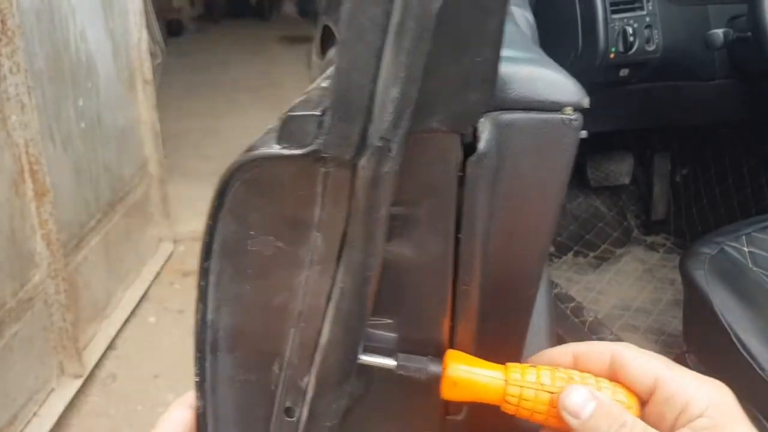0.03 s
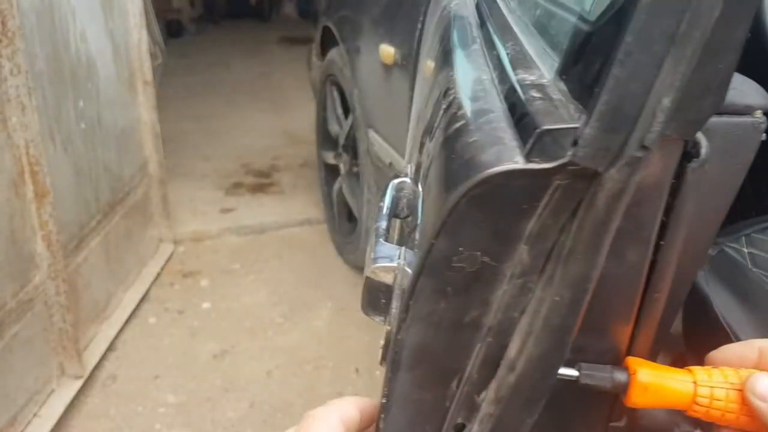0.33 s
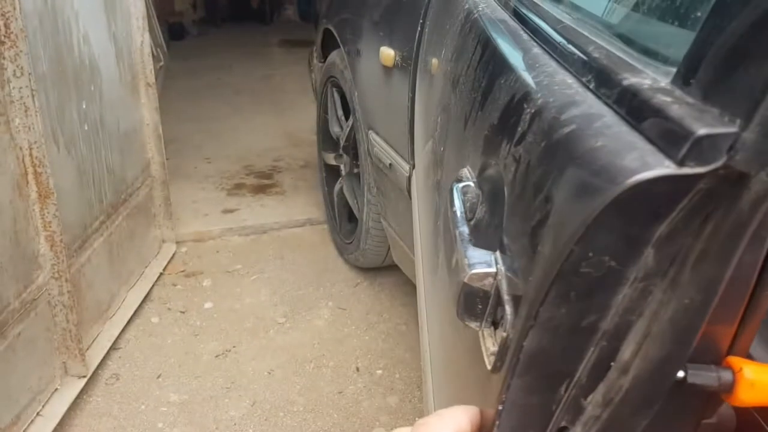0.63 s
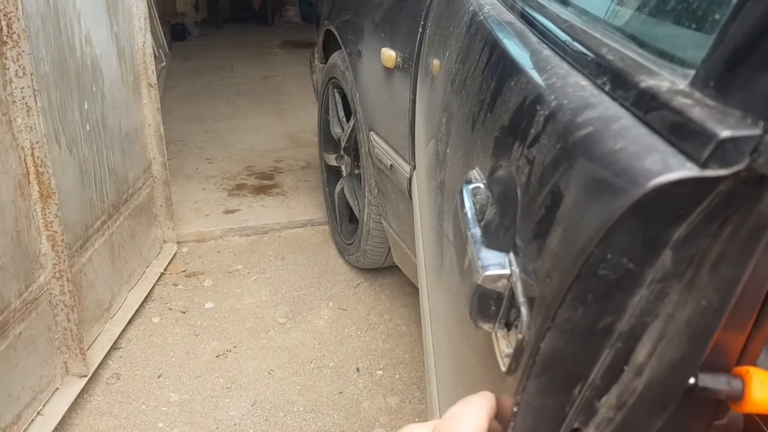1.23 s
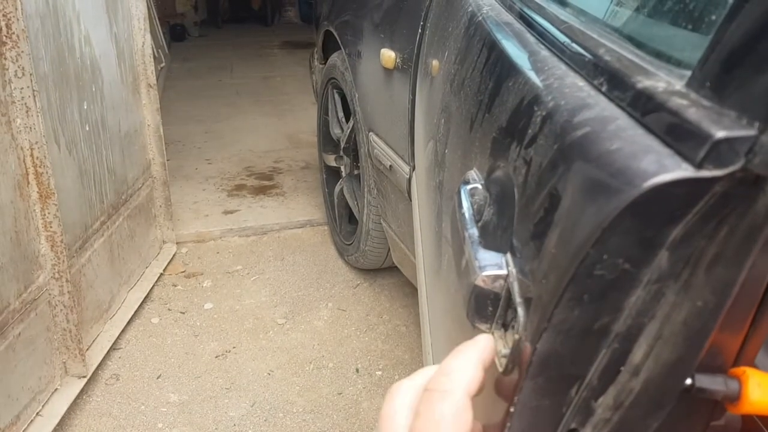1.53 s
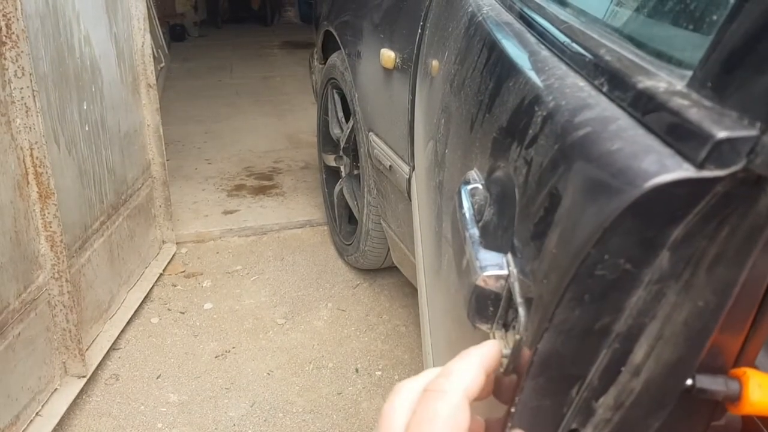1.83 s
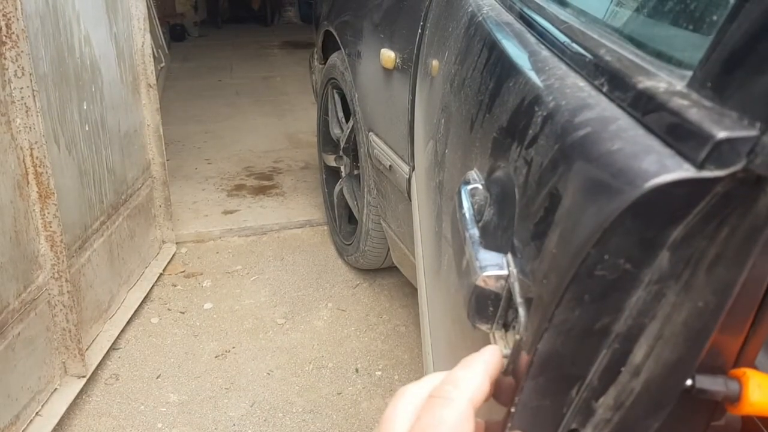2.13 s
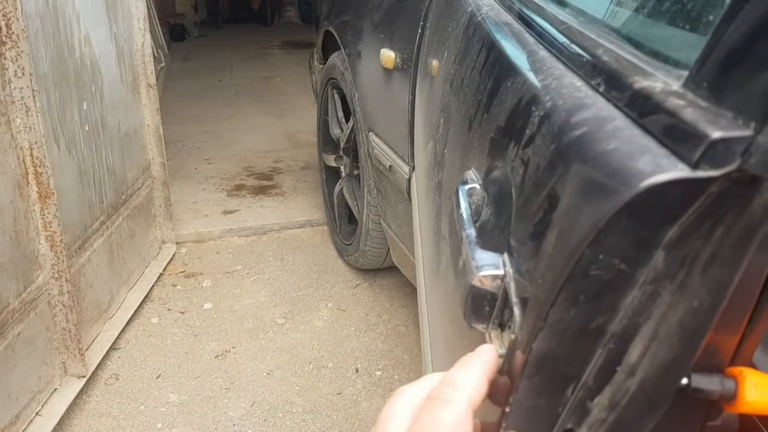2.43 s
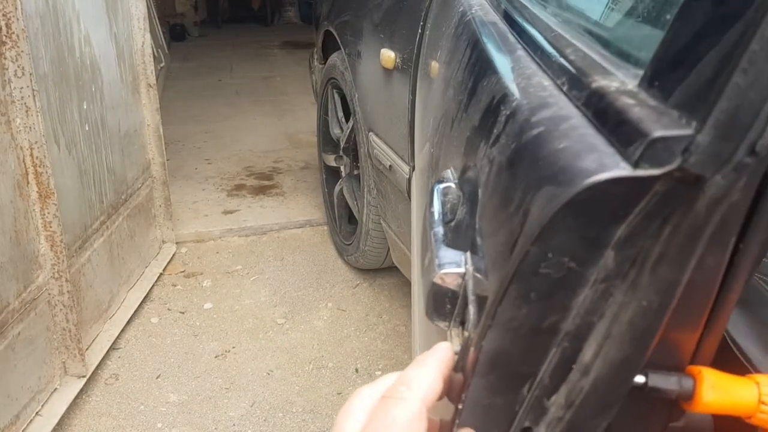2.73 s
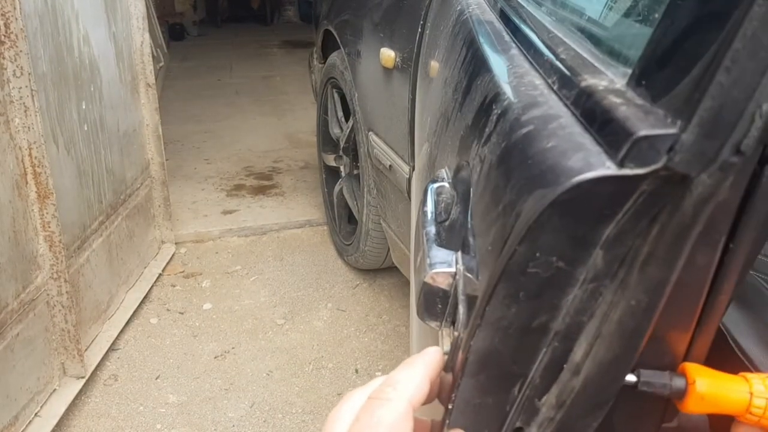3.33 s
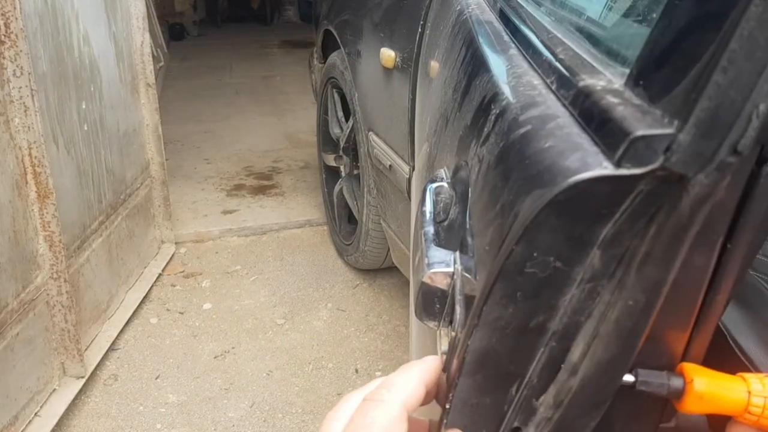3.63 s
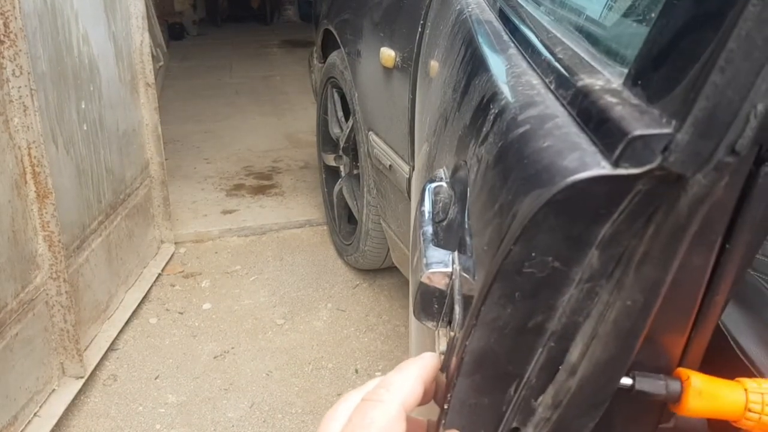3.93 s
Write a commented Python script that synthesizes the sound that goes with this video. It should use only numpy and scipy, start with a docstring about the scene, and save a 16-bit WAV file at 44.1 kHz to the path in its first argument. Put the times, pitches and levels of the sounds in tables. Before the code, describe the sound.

A dry car door hinge squeals twice as the door is swung by hand. Each high squeal starts with a small chirp, turns raspy and rings briefly in the garage. A low rumble continues underneath.

```python
"""A dry car door hinge squeals twice as the door is swung by hand in a garage.
Each squeal starts with a small chirp, then the pin sticks and slips so fast that it sings near 3.8 kHz.
As it binds harder a higher tone takes over, an octave below joins in and the slipping turns raspy.
The door steel and the garage ring on over a low rumble. Later the hand rubs softly on the door,
a hum grows and there is one faint hoot."""
import sys
import numpy as np
from scipy import signal
from scipy.fft import rfft, irfft
from scipy.io import wavfile

SR = 44100
rng = np.random.default_rng(int(sys.argv[2]) if len(sys.argv) > 2 else 0)


def dump(signal):
    """Clip the signal to [-1, 1] and save it as 16-bit WAV at the path in sys.argv[1]."""
    limited = np.clip(np.atleast_2d(signal).T, -1, 1)
    pcm = np.round(limited * 32767).astype(np.int16)
    wavfile.write(sys.argv[1], SR, pcm)


N = 176400
T = np.arange(N) / SR
HZ = np.fft.rfftfreq(N, 1 / SR)

# Tone colour of the low rumble and of the faint air: frequency_hz, level_db
RUMBLE_COLOUR = [(12, -33), (24, -5), (32, -17.5), (45, -1.5), (75, 0), (105, -1.5), (150, -15),
                 (180, -10.5), (230, -19), (290, -23.5), (380, -32), (600, -70)]
AIR_COLOUR = [(180, -31), (300, -8.5), (424, -12), (709, -18.5), (770, -23), (809, -12), (1570, -19),
              (1760, -25), (2080, -23), (2330, -30), (2660, -29), (3890, -26), (7530, -40), (12400, -24),
              (15600, -23)]
# How the rumble and the hum rise and fall: time_s, level_db
RUMBLE_LOUDNESS = [(0, -51), (.45, -50.5), (.95, -49), (1.15, -44.5), (1.35, -48.5), (1.6, -50), (2.0, -51),
                   (2.65, -48), (3.2, -49.5), (4, -48)]
HUM_LOUDNESS = [(0, -61), (2.6, -56), (2.85, -44.5), (3.1, -47), (3.6, -48.5), (4, -51)]
# Thin, steady whistles in the background: pitch_hz, width_hz, level_db
THIN_WHISTLES = [(291.8, 10.2, -72.5), (764, 17, -80), (2299, 50, -74)]
# How alike the background noise is on the two sides: frequency_hz, likeness_0_to_1
SIDE_LIKENESS = [(30, 1), (130, 0.92), (260, 0.89), (500, 0.7), (1000, 1), (2300, 0.32), (5000, 0.15),
                 (15000, 0.033)]
# How far the background leans to the left: frequency_hz, left_minus_right_db
LEFT_LEAN = [(30, 17.5), (70, 5.5), (150, 2), (500, 4.5), (1000, 0.5), (2300, 7), (5000, 4), (12000, 1.5)]
# Chirps, side tones and groans of the hinge: start_s, length_s, start_hz, end_hz, level_db
HINGE_CHIRPS = [(0.159, 0.073, 2594, 2375, -54.5), (0.194, 0.061, 2380, 2274, -50.5),
                (0.219, 0.068, 2295, 2270, -43.5), (0.185, 0.14, 4300, 4370, -54),
                (0.324, 0.22, 4008, 4030, -41.5), (.34, 0.308, 5860, 5792, -41),
                (0.441, 0.17, 1983, 1961, -40.5), (1.549, 0.072, 2320, 2318, -50),
                (1.587, 0.065, 2200, 2065, -61.5), (1.633, 0.16, 4310, 4320, -42),
                (1.66, 0.13, 4098, 4050, -42), (1.66, .13, 1170, 1077, -68.5),
                (1.729, 0.17, 5897, 5825, -46.5), (1.78, 0.12, 1060, 924, -62),
                (2.297, 0.11, 3755, 3797, -65), (2.33, 0.15, 3922, 3990, -69),
                (2.73, 0.194, 2800, 2890, -76)]
# Small knocks from the door: start_s, level_db, centre_hz
DOOR_KNOCKS = [(.169, -62, 5000), (.337, -58, 1100), (.6, -52.5, 1500)]
# The pin in each swing. It sings a "free" tone when turning easily and a "bound" tone when tight:
# time_s, free_tone_db, bound_tone_db, octave_below_share_db, roughness_0_to_1
FIRST_PIN_PATH = [(.205, -74, -64, -45, 0.7), (.24, -44.5, -75, -46, 0.75), (.275, -42.5, -53.5, -57, 0.65),
                  (.31, -32.5, -53, -38, 0.12), (.355, -32.5, -49, -8.5, 0.29), (.39, -46, -36, -5, 0.1),
                  (.44, -50, -35.5, -6, 0.54), (.5, -40, -49, 6, 0.74), (.57, -46, -45, -2, 0.88),
                  (.615, -34.5, -68, -5.5, 0.36), (.7, -33.5, -50, -16, 0.13), (.74, -34, -58, -14, 0.2),
                  (.79, -37, -80, -10, 0.25)]
SECOND_PIN_PATH = [(1.65, -76, -69, -41.5, 0.79), (1.685, -50.5, -49, -40, 1),
                   (1.725, -35.5, -48, -30, 0.34), (1.765, -34, -44, -8.5, 0.19),
                   (1.8, -42, -48.5, -1, 0.47), (1.845, -46, -44, 2.5, 0.37), (1.94, -53, -39, -21.5, 0.51),
                   (1.975, -36.5, -48.5, -6, 0.17), (2.015, -35.5, -55, -7, 0.047),
                   (2.07, -64, -62, 2, 0.18), (2.11, -66, -73, 0, 0.091), (2.2, -75, -73, -14, 0.075)]
# The pure tones that make up the squeal and its octave below: pitch_multiple, level_db
SQUEAL_PARTIALS = [(1, 0), (2, -13), (3, -19), (4, -46)]
OCTAVE_BELOW_PARTIALS = [(.5, -5), (1.5, -2), (2.5, -19), (3.5, -35)]
# Tone colour of the pin's heavy rasp and light rasp: frequency_hz, level_db
HEAVY_RASP_COLOUR = [(200, -43.5), (600, -17.5), (1000, -10), (1300, -21.5), (1850, 0), (2300, 0.5),
                     (2750, -21.5), (3300, -1), (3800, -2.5), (4600, -5.5), (5700, 0.5), (6600, -3),
                     (7600, -6.5), (8600, -42.5), (9800, -7.5), (11500, -20), (13000, -33), (16000, -36)]
LIGHT_RASP_COLOUR = [(500, -24.5), (1100, -29.5), (1500, -58.5), (2900, -75.5), (3700, 12.5), (4300, -26.5),
                     (4800, -21.5), (6100, -28), (7500, 0), (9200, -52), (11400, -3), (13500, -42)]
# Ringing notes of the hinge and door steel: pitch_hz, level_db, ring_s (time to fall 60 dB)
STEEL_NOTES = [(2103, -8, 1), (2430, -2, 0.74), (3780, -13, 0.39), (3373, -2, 0.99), (3766, 17.5, 1),
               (3930, -2, 0.23), (3980, -2.5, 1), (4380, -21, 1), (4140, -13.5, 0.21), (4000, -10, 1),
               (4905, -7.5, 0.1), (6370, -24, 0.44), (7702, -13, 0.14), (7470, -12, 0.14)]
# How long the garage echoes: frequency_hz, ring_s (time to fall 60 dB)
GARAGE_RING = [(300, 1), (2000, 0.85), (3800, 0.81), (5800, 0.88), (7600, 0.43), (11500, 0.65)]
# How the hinge and its echo change on the right side: frequency_hz, gain_db
RIGHT_COLOUR = [(500, -8.5), (1900, -17), (2500, -6.5), (3800, -4.5), (5800, -3.5), (7600, -8.5),
                (9800, -1.5), (11400, -10), (15000, 2)]
# Soft rubs of the hand on the door: start_s, length_s, level_db
HAND_RUBS = [(2.593, 0.087, -80), (2.972, 0.27, -70), (3.486, 0.21, -73)]
# Tone colour of those rubs: frequency_hz, level_db
RUB_COLOUR = [(200, -28), (450, 0.5), (850, 1), (1200, -15), (2000, -13), (5000, -35)]

JITTER_S = 0.00186  # time scale of the fast flutter in the tones


def amp(db):
    """Turns decibels into a number to multiply by."""
    return 10 ** (np.asarray(db) / 20)


def unit(x):
    """Scales a signal to an average (rms) size of 1."""
    return x / np.sqrt(np.mean(abs(x) ** 2) + 1e-20)


def read(points, hz=HZ):
    """Fills in a curve between its points, with octaves evenly spaced."""
    point_hz, value = np.transpose(points)
    return np.interp(np.log(hz + 1), np.log(point_hz), value)


def colour(x, points):
    """Turns each frequency up or down by a curve in dB."""
    return irfft(rfft(x) * amp(read(points)), N)


def drift(seconds):
    """A smooth random wobble of size 1; more seconds make it slower."""
    return unit(irfft(rfft(rng.standard_normal(N)) / (1 + (HZ * seconds * 2) ** 4), N))


def add(mix, start_s, sound):
    """Mixes a sound in at its start time."""
    part = mix[max(round(start_s * SR), 0):][:len(sound)]
    part += sound[:len(part)]


def later(x, seconds):
    """Delays a sound; its end wraps round to the start."""
    return irfft(rfft(x) * np.exp(-2j * np.pi * HZ * seconds), N)


def noise_pair():
    """Left and right hiss, alike in the bass and less so in the treble."""
    shared, separate = rfft(rng.standard_normal((2, N)))
    likeness = np.clip(read(SIDE_LIKENESS), -1, 1)
    right = likeness * shared + np.sqrt(1 - likeness ** 2) * separate
    return irfft(np.array([shared, right]), N)


def background():
    """Low rumble, faint air, thin whistles, a wavering hum that grows and one brief hoot."""
    rumble_gain = amp(np.interp(T, *np.transpose(RUMBLE_LOUDNESS)))
    noise = rumble_gain * unit(colour(noise_pair(), RUMBLE_COLOUR))
    noise += amp(-66.5) * unit(colour(noise_pair(), AIR_COLOUR))
    for hz, width_hz, db in THIN_WHISTLES:
        narrow_band = 1 / (1 + ((HZ - hz) / width_hz) ** 2)
        noise += amp(db) * unit(irfft(rfft(noise_pair()) * narrow_band, N))
    hum_hz = 71.5 + 1.98 * drift(.1)
    hum_gain = amp(np.interp(T, *np.transpose(HUM_LOUDNESS)))
    tones = np.sqrt(2) * hum_gain * np.sin(2 * np.pi * np.cumsum(hum_hz) / SR)
    hoot = chirp(length_s=.1, start_hz=543.66, end_hz=538.33, db=-62.5, jitter_hz=26)
    add(tones, 3.71, hoot)
    lean = amp(np.outer([.5, -.5], read(LEFT_LEAN)))
    return irfft(rfft(noise + tones) * lean, N)


def chirp(length_s, start_hz, end_hz, db, jitter_hz):
    """A short, unsteady tone that glides as it swells and fades."""
    progress = np.arange(0, 1, 1 / (length_s * SR))
    hz = start_hz + (end_hz - start_hz) * progress + jitter_hz * drift(JITTER_S)[:len(progress)]
    swell = np.sin(np.pi * progress) ** 2
    return amp(db) * np.sqrt(2) * swell * np.sin(2 * np.pi * np.cumsum(hz) / SR)


def door_knock(db, centre_hz, decay_s=0.0094):
    """A dull tick from the door: a burst of noise that dies at once."""
    band = signal.butter(1, [centre_hz / 2, min(centre_hz * 2, SR / 2.1)], "band", fs=SR)
    burst = unit(signal.lfilter(*band, rng.standard_normal(2048)))
    return amp(db) * burst * np.exp(-T[:2048] / decay_s)


def hinge_squeal(pin_path, free_hz, bound_hz, sag_hz_per_s, free_octave_db):
    """The pin sticks and slips, singing two tones; its tiny slips rasp and ring the steel."""
    times, *columns = np.transpose(pin_path)
    free_db, bound_db, octave_db, rough = (np.interp(T, times, column) for column in columns)
    elapsed = T - times[0]
    moving = np.clip(elapsed / .0125, 0, 1) * np.clip((times[-1] - T) / .05, 0, 1)  # fade in and out
    free, bound, octave_share = amp(free_db) * moving, amp(bound_db) * moving, amp(octave_db)
    level = np.hypot(free, bound)

    def phase(start_hz, waver_hz=5, jitter_rad=.45):
        """The pitch sinks and wavers; rough slipping shakes the wave's timing."""
        hz = start_hz - sag_hz_per_s * elapsed + waver_hz * drift(0.01)
        return 2 * np.pi * np.cumsum(hz) / SR + jitter_rad * rough * drift(JITTER_S)
    low, high = phase(free_hz), phase(bound_hz)

    def partials(table, free_gain, shimmer=.55):
        """Stacks pure tones on both pitches; roughness makes them flicker."""
        stack = np.zeros(N)
        for multiple, db in table:
            both = free_gain * np.cos(multiple * low) + bound * np.cos(multiple * high)
            stack += amp(db) * both * (1 + shimmer * rough * drift(JITTER_S))
        return stack
    main = partials(SQUEAL_PARTIALS, free)
    octave_below = octave_share * partials(OCTAVE_BELOW_PARTIALS, free * amp(free_octave_db))
    # Sounding together, the two tones clash and make three more.
    overlap = free * bound / (level + 1e-9)
    clash = overlap * (np.cos(2 * high - low) + np.cos(2 * low - high) + .5 * np.cos(low + high))
    tone = np.sqrt(2) * (main + octave_below + amp(-6.5) * clash)
    slips, grind = pin_slips(), level * rough
    return tone + grind * pin_rasp(slips, octave_share) + amp(-6) * steel_ring(grind * unit(slips))


def pin_slips(per_s=2500, spread_db=0.5):
    """A dense stream of tiny slips, each one a click of uneven size."""
    size = amp(spread_db * np.minimum(rng.exponential(1, N), 4)) * rng.choice([-1, 1], N)
    return size * (rng.random(N) < per_s / SR)


def pin_rasp(slips, octave_share):
    """The slips blur into a rasp whose heavy part grows with the octave below."""
    heavy = amp(-3.5) * np.sqrt(octave_share) * unit(colour(slips, HEAVY_RASP_COLOUR))
    light = amp(-16) * unit(colour(slips, LIGHT_RASP_COLOUR))
    return heavy + light


def steel_ring(slips):
    """Each slip taps the steel, which rings on at its own notes."""
    t = T[:SR]
    ring = sum(amp(db - 60 * t / ring_s) / np.sqrt(ring_s) * np.sin(2 * np.pi * hz * t)
               for hz, db, ring_s in STEEL_NOTES)
    return signal.fftconvolve(slips, ring / np.linalg.norm(ring))[:N]


def garage_echo(sound):
    """The garage smears the sound into a tail on each side, the treble dying first."""
    hz, t, noise = signal.stft(rng.standard_normal((2, SR)), SR, nperseg=256)
    decay = amp(-60 * t / read(GARAGE_RING, hz)[:, None])
    tail = signal.istft(noise * decay, SR, nperseg=256)[1]
    return signal.fftconvolve(sound[None], tail / np.linalg.norm(tail[0]), axes=1)[:, :N]


def hand_rubs():
    """The hand slides on the door: dull friction noise that swells and fades."""
    swell = sum(amp(db) * np.sin(np.pi * np.clip((T - start_s) / length_s, 0, 1)) ** 2
                for start_s, length_s, db in HAND_RUBS)
    return swell * unit(colour(rng.standard_normal((2, N)), RUB_COLOUR))


def scene():
    """Two swings in the garage; the hinge is nearer the left, so the right hears it later."""
    hinge = hinge_squeal(FIRST_PIN_PATH, free_hz=3784, bound_hz=3950,
                         sag_hz_per_s=45, free_octave_db=-5.5)
    hinge += hinge_squeal(SECOND_PIN_PATH, free_hz=3770, bound_hz=3934,
                          sag_hz_per_s=8, free_octave_db=-23.5)
    for start_s, *shape in HINGE_CHIRPS:
        add(hinge, start_s, chirp(*shape, jitter_hz=35))
    for start_s, db, centre_hz in DOOR_KNOCKS:
        add(hinge, start_s, door_knock(db, centre_hz))
    echo = garage_echo(hinge)
    quiet_sounds = background() + hand_rubs()
    left = hinge + amp(-6.5) * echo[0] + quiet_sounds[0]
    right = colour(later(hinge, seconds=.00007) + amp(-6) * echo[1], RIGHT_COLOUR)
    right += later(quiet_sounds[1], seconds=.0004)
    return np.array([left, right])


def record(dry):
    """Cuts away the very highest treble."""
    low_pass = signal.firwin(511, cutoff=15750, window=("kaiser", 9), fs=SR)
    return signal.oaconvolve(dry, low_pass[None], "same")


dry = scene()
out = record(dry)
dump(out)
```